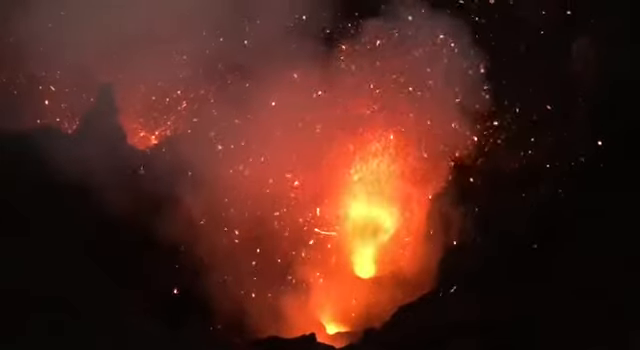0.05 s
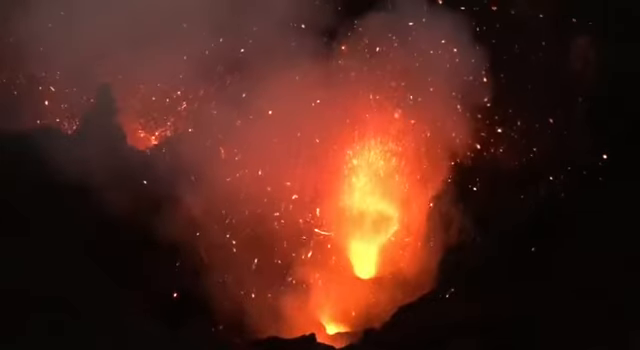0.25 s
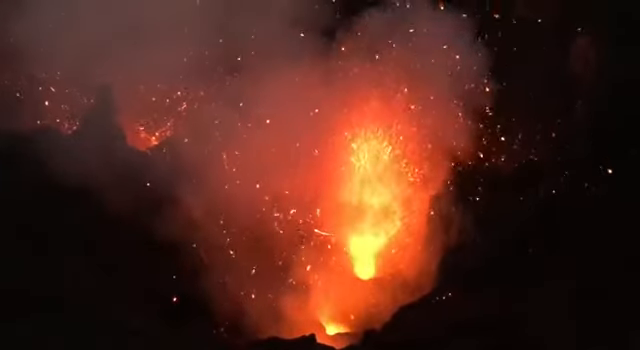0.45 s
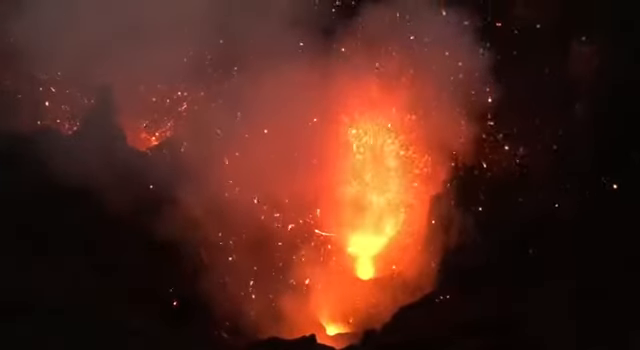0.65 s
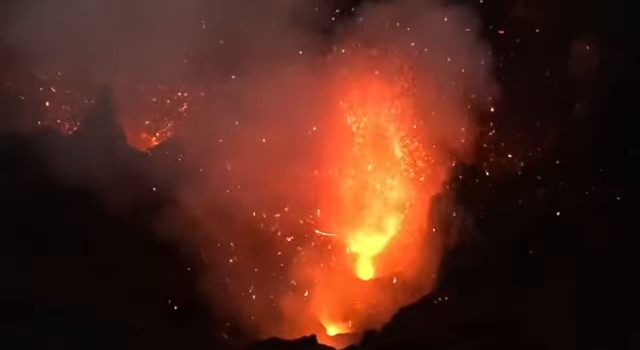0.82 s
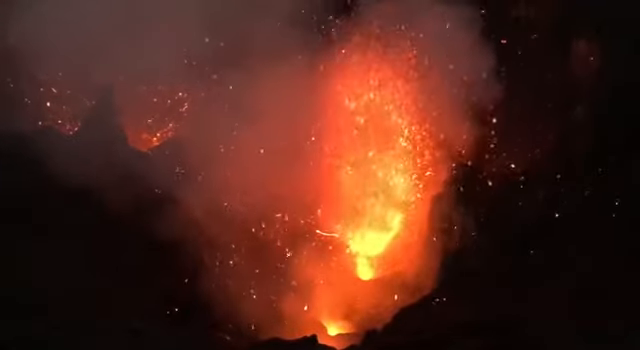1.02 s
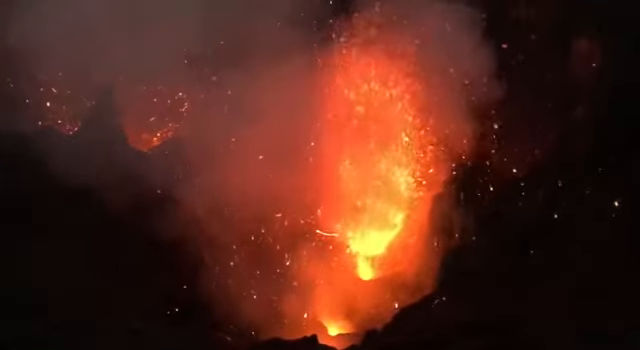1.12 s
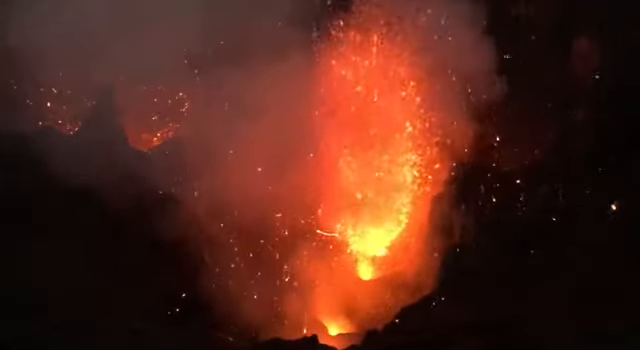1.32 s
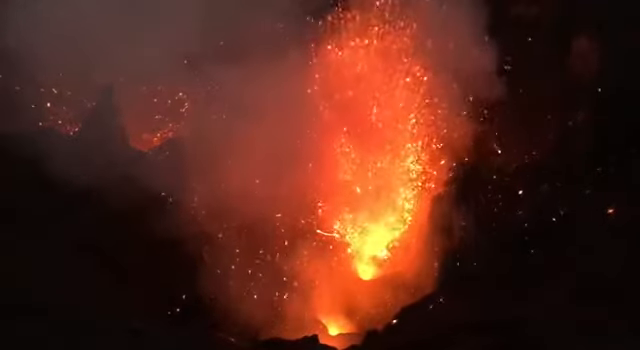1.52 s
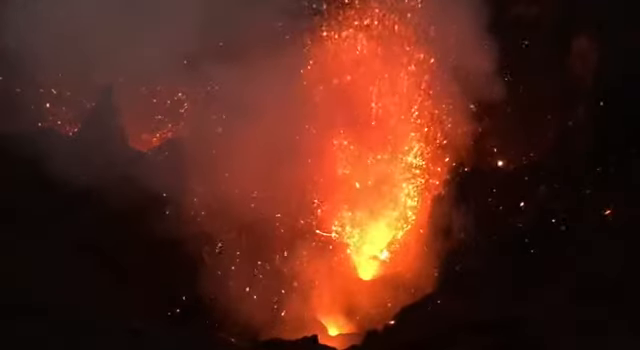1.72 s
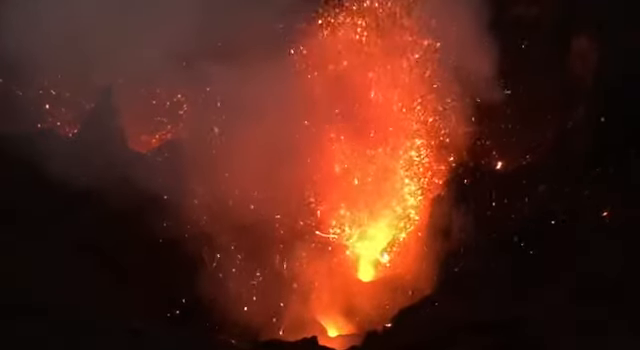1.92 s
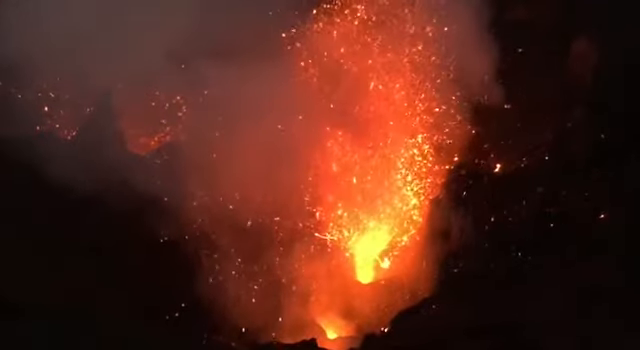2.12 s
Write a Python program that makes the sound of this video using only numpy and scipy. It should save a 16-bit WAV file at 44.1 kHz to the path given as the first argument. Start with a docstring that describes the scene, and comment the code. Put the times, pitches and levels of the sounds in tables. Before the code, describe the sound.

A volcano erupts across an open crater. A quiet low rumble breaks at about 0.2 seconds into a sudden heavy blast with a deep throb. A rough, hissing roar of gas and lava peaks around 0.6 seconds with short throaty gushes, slightly overloading the microphone. It surges again near 1.4 seconds, then sinks to a rumble by 2 seconds while falling lava sizzles faintly.

```python
"""A low rumble, then a blast swelling within 50 ms: a volcanic vent bursts open at night, across a crater.
Gas swinging in the conduit throbs deeply; the jet of gas and lava roars in two surges and sinks.
Gushes bark in the vent's mouth and falling lava sizzles. Small shocks crackle in the jet and the
crater walls scatter them. The loudest swings overload the microphone softly."""
import sys
import numpy as np
from scipy import signal
from scipy.fft import rfft, irfft
from scipy.io import wavfile

SR = 44100
rng = np.random.default_rng(int(sys.argv[2]) if len(sys.argv) > 2 else 0)


def output_pcm(signal):
    """Save a mono or channel-first signal as 16-bit PCM at the path in sys.argv[1].

    Samples are clipped to [-1, 1] before scaling.
    """
    pcm = np.clip(np.atleast_2d(signal).T, -1, 1) * 32767
    wavfile.write(sys.argv[1], SR, np.round(pcm).astype(np.int16))


N = 94815
TIME_S = np.arange(N) / SR
FREQ_HZ = np.fft.rfftfreq(N, 1 / SR)

# Layer envelopes. Each row: time in seconds, level in dB.
RUMBLE_LEVELS = [(0, -36.5), (.1, -33.5), (.2, -32.5), (2.15, -40)]
BASS_LEVELS = [(.19, -41), (.235, -30), (.29, -15), (.4, -12.5), (.55, -13), (.68, -10.5), (.79, -10.5),
               (.86, -15.5), (1.03, -15), (1.2, -17), (1.31, -14.5), (1.37, -19.5), (1.44, -12),
               (1.56, -16.5), (1.7, -20), (1.82, -29.5), (1.95, -29), (2.15, -37.5)]
ROAR_LEVELS = [(.19, -43), (.203, -23.5), (.24, -12), (.32, -22.5), (.43, -12), (.5, -20), (.59, -8),
               (.73, -11.5), (.85, -15), (.93, -13), (1.0, -17), (1.26, -17), (1.38, -12.5), (1.5, -18),
               (1.59, -15.5), (1.76, -21), (1.83, -27), (2.06, -27), (2.15, -31.5)]
SIZZLE_LEVELS = [(.2, -77), (1.0, -63), (1.6, -49.5), (2.15, -58)]
# Upper jet envelopes. Each row: time in seconds, rush level in dB, hiss level in dB.
RUSH_HISS_LEVELS = [(.19, -39, -49), (.204, -31.5, -42), (.22, -24.5, -33.5), (.24, -18, -28.5),
                    (.33, -20.5, -38), (.43, -18.5, -36.5), (.5, -20, -34.5), (.59, -17, -30.5),
                    (.67, -17.5, -29), (.76, -20, -32), (.86, -22, -36), (1.0, -22, -36.5),
                    (1.15, -21.5, -35.5), (1.27, -20, -33.5), (1.45, -20.5, -34.5), (1.66, -23.5, -38),
                    (1.83, -31, -43), (2.05, -32.5, -46.5), (2.15, -35.5, -47.5)]
# Layer spectra. Each row: frequency in Hz, relative spectral density in dB.
RUMBLE_SPECTRUM = [(10, -39.5), (28, -5), (85, 0), (140, -4), (220, -4), (320, -15.5), (460, -17),
                   (1100, -20.5), (1500, -25.5), (2100, -28), (2600, -33.5), (3800, -34), (7000, -48),
                   (10000, -61.5), (12000, -93)]
BASS_SPECTRUM = [(8, -61.5), (24, -24), (33, -19), (42, -10), (54, -4.5), (80, -3.5), (103, -3), (125, -8),
                 (200, -26.5), (500, -84)]
ROAR_SPECTRUM = [(50, -38.5), (95, -7), (130, 0), (200, 4), (250, 3), (315, -2), (370, -8.5), (600, -32),
                 (1500, -84)]
RUSH_SPECTRUM = [(100, -45), (300, -13.5), (370, -1), (425, -3.5), (470, -1.5), (560, -2), (700, .5),
                 (1050, -3), (1350, -5.5), (1650, -5.5), (1950, -12), (2300, -13.5), (3000, -29.5),
                 (6000, -79)]
HISS_SPECTRUM = [(800, -37.5), (1800, -6), (2600, 0), (3200, 1), (3900, -0.5), (4500, -6.5), (5500, -13.5),
                 (7000, -19.5), (8500, -30), (10000, -43), (11000, -57.5)]
SIZZLE_SPECTRUM = [(2000, -36), (4800, -0.5), (7000, -5.5), (8500, -15), (10000, -26), (11000, -41)]
# The vent's throb. Each row: time in seconds, pitch in Hz, level in dB.
THROB_TRACK = [(0.189, 65.8, -33), (.235, 67.8, -17), (.29, 62.7, -13.5), (0.321, 60.8, -39),
               (0.357, 64, -8.5), (0.409, 70.9, -12.5), (.46, 63.4, -8.5), (.505, 62, -8),
               (0.551, 66.5, -26), (0.699, 67.8, -59)]
# Higher conduit resonances. Each row: centre in Hz, half-width in Hz, gain in dB.
CONDUIT_MODES = [(172, 9.4, -15.5), (326, 45, -17), (502, 70, -23.5)]
# Gas gushes. Each row: start in seconds, centre in Hz, level in dB.
GUSHES = [(.405, 605, -17.5), (0.566, 710, -16.5), (.605, 875, -17.5), (.69, 480, -27)]


def amp(db):
    """Decibels to gain."""
    return 10 ** (np.asarray(db) / 20)


def unit_rms(x):
    """Scales to rms 1."""
    return x / np.sqrt(np.mean(x ** 2) + 1e-20)


def envelope(table, column=1):
    """Gain along a dB curve, silent before it starts."""
    columns = np.transpose(table)
    return amp(np.interp(TIME_S, columns[0], columns[column], left=-120))


def coloured(x, spectrum):
    """Filters x by a spectrum; rms 1."""
    hz, db = np.transpose(spectrum)
    gain = amp(np.interp(np.log(FREQ_HZ + 1), np.log(hz + 1), db))
    return unit_rms(irfft(rfft(x) * gain, N))


def drift(rate_hz):
    """Random wander from 2 Hz to about rate_hz; rms 1."""
    gain = (FREQ_HZ > 2) / (1 + (FREQ_HZ / rate_hz) ** 4)
    return unit_rms(irfft(rfft(rng.standard_normal(N)) * gain, N))


def steady(x, span_s):
    """Holds local power near 1, keeping the fast grain."""
    window = np.exp(-.5 * (np.linspace(-.5, .5, SR) / span_s) ** 2)
    weight = signal.fftconvolve(np.ones(N), window, "same")
    power = signal.fftconvolve(x ** 2, window, "same") / weight
    return x / np.sqrt(abs(power) + 1e-9)


def band_noise(centre_hz, half_width_hz):
    """Noise in one resonance, at an even level."""
    gain = 1 / (1 + ((FREQ_HZ - centre_hz) / half_width_hz) ** 4)
    band = irfft(rfft(rng.standard_normal(N)) * gain, N)
    return steady(unit_rms(band), span_s=0.042)


def rumble():
    """The crater's low churning, gathering just before the blast."""
    churn = coloured(rng.standard_normal(N), RUMBLE_SPECTRUM)
    return envelope(RUMBLE_LEVELS) * steady(churn, span_s=0.045)


def vent_throb(waver_fraction=0.057, flutter_db=3.4):
    """The blast sets the gas in the conduit swinging: a deep, unsteady tone."""
    times_s, track_hz, _ = np.transpose(THROB_TRACK)
    pitch_hz = np.interp(TIME_S, times_s, track_hz) * (1 + waver_fraction * drift(rate_hz=23))
    tone = np.sqrt(2) * np.sin(2 * np.pi * np.cumsum(pitch_hz) / SR)
    flutter = amp(flutter_db * drift(rate_hz=36))
    return tone * envelope(THROB_TRACK, column=2) * flutter


def conduit_ring(blast_s=0.2, rise_s=0.078, t60_s=1.0):
    """The blast rings the conduit's rough higher resonances."""
    age_s = np.maximum(TIME_S - blast_s, 0)
    shape = np.minimum(age_s / rise_s, 1) * amp(-60 * age_s / t60_s)
    return shape * sum(amp(db) * band_noise(hz, half_width) for hz, half_width, db in CONDUIT_MODES)


def shocks(rate_per_s=900, spread_db=3.5):
    """A dense train of small shock fronts of uneven size."""
    sizes = amp(spread_db * np.minimum(rng.exponential(1, N), 4))
    return sizes * (rng.random(N) < rate_per_s / SR)


def crater_scatter(x, echoes_per_s=2000, t60_s=0.34, tail_db=-3):
    """Rock walls scatter a short tail behind each shock."""
    delay_s = TIME_S[:SR // 2]
    echoes = rng.standard_normal(len(delay_s)) * (rng.random(len(delay_s)) < echoes_per_s / SR)
    echoes *= amp(-60 * delay_s / t60_s)
    tail = signal.fftconvolve(x, echoes / np.linalg.norm(echoes))[:N]
    return x + amp(tail_db) * tail


def turbulence(fronts, spectrum, shock_share, span_s):
    """Smooth flow noise mixed by power with shock fronts, at an even level."""
    flow = np.sqrt(1 - shock_share) * rng.standard_normal(N) + np.sqrt(shock_share) * fronts
    return steady(coloured(flow, spectrum), span_s)


def jet():
    """The largest eddies boom and roar, smaller ones rush and hiss; the upper three billow together."""
    fronts = unit_rms(crater_scatter(shocks()))
    billow = drift(rate_hz=30)
    bass = turbulence(fronts, BASS_SPECTRUM, shock_share=0.082, span_s=0.025)
    roar = turbulence(fronts, ROAR_SPECTRUM, shock_share=0.23, span_s=0.016)
    rush = turbulence(fronts, RUSH_SPECTRUM, shock_share=0.35, span_s=0.024)
    hiss = turbulence(fronts, HISS_SPECTRUM, shock_share=0.12, span_s=0.049)
    return (bass * envelope(BASS_LEVELS)
            + roar * envelope(ROAR_LEVELS) * amp(0.44 * billow)
            + rush * envelope(RUSH_HISS_LEVELS, column=1) * amp(0.47 * billow)
            + hiss * envelope(RUSH_HISS_LEVELS, column=2) * amp(0.5 * billow))


def lava_sizzle():
    """Distant falling spatter blends into a thin hiss that builds after the blast."""
    return envelope(SIZZLE_LEVELS) * coloured(rng.standard_normal(N), SIZZLE_SPECTRUM)


def gas_bark(start_s, centre_hz, level_db, rise_s=0.02, decay_after_s=0.025, t60_s=0.39):
    """A short throaty gush in the vent's mouth during the first surge."""
    age_s = np.maximum(TIME_S - start_s, 0)
    attack = np.minimum(age_s / rise_s, 1)
    decay = amp(-60 * np.maximum(age_s - decay_after_s, 0) / t60_s)
    return amp(level_db) * attack * decay * band_noise(centre_hz, half_width_hz=280)


def scene():
    """Rumble, vent, jet and spatter at one microphone."""
    mix = rumble() + vent_throb() + conduit_ring() + jet() + lava_sizzle()
    mix += sum(gas_bark(*gush) for gush in GUSHES)
    return mix[None]


def record(dry):
    """Soft overload near full scale, then a low-pass."""
    cutoff_hz = 10600
    clipped = dry / (1 + dry ** 6) ** (1 / 6)
    lowpass = signal.firwin(255, cutoff_hz, window=("kaiser", 9), fs=SR)
    return signal.oaconvolve(clipped, lowpass[None], "same")


dry = scene()
out = record(dry)
output_pcm(out)
```